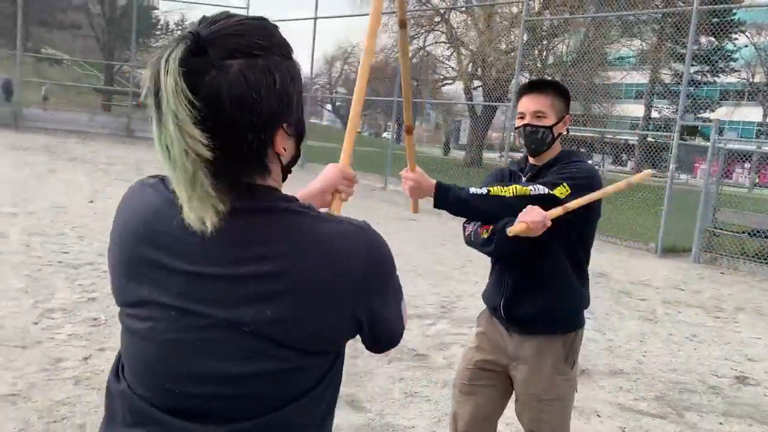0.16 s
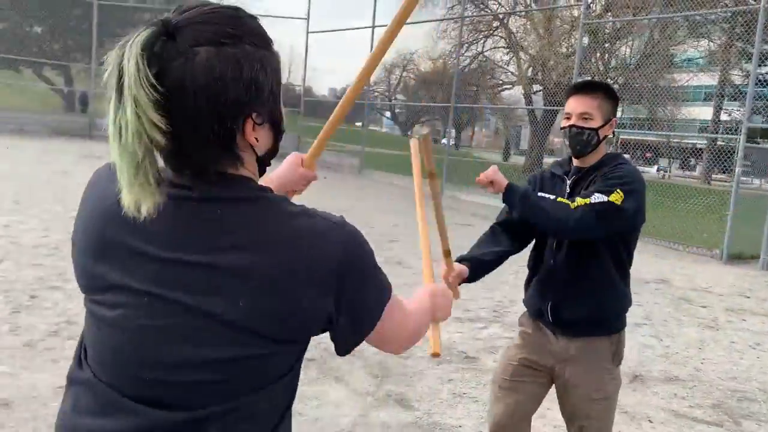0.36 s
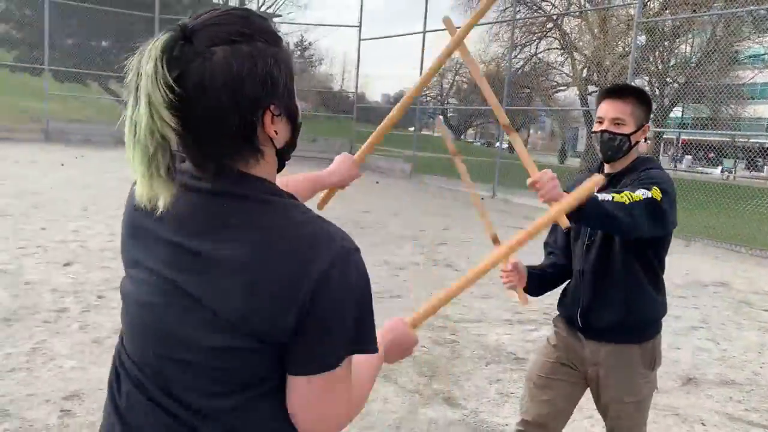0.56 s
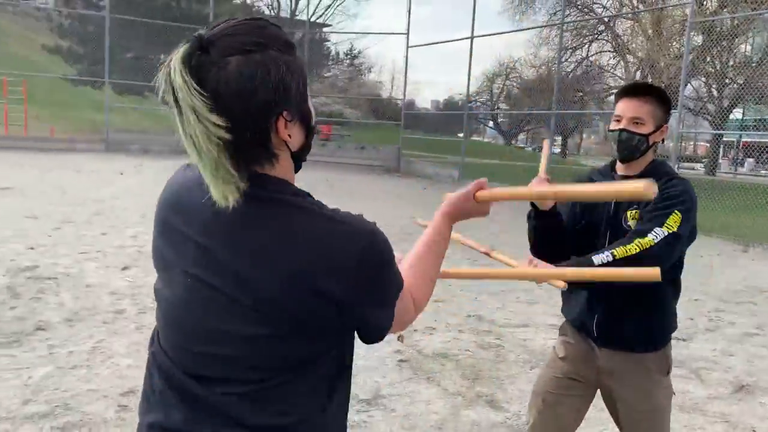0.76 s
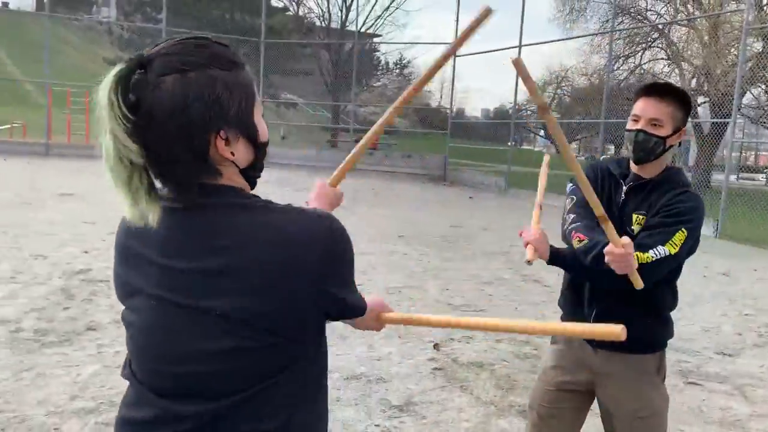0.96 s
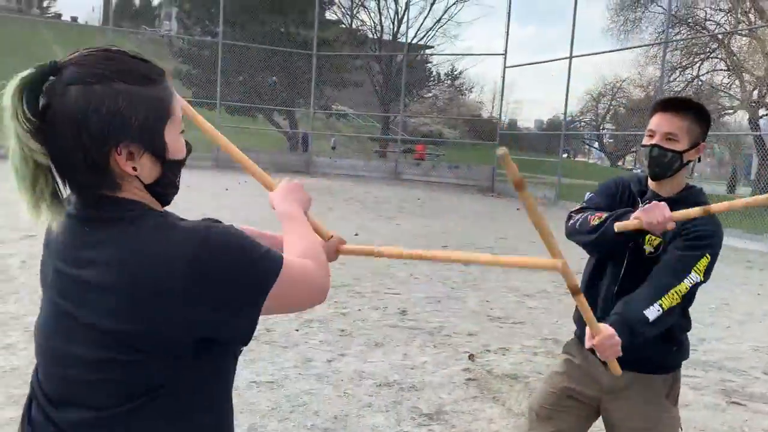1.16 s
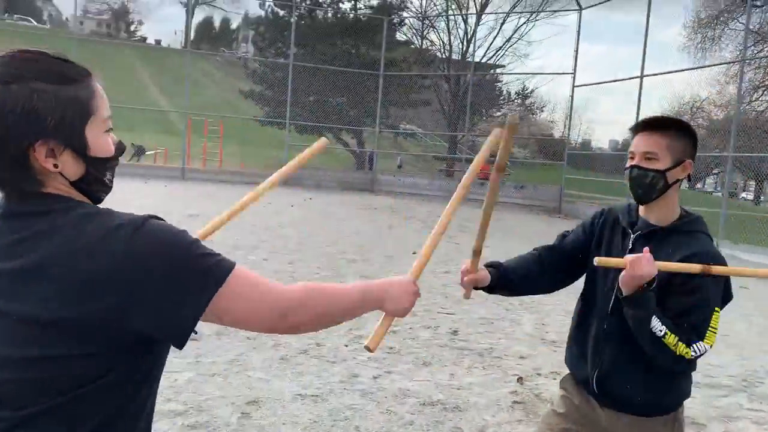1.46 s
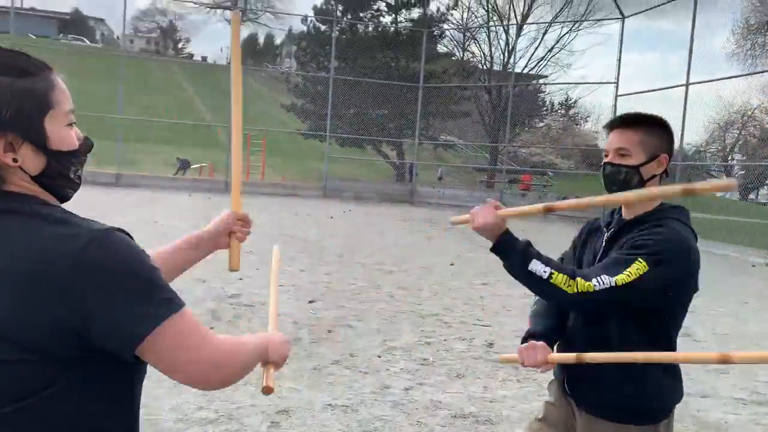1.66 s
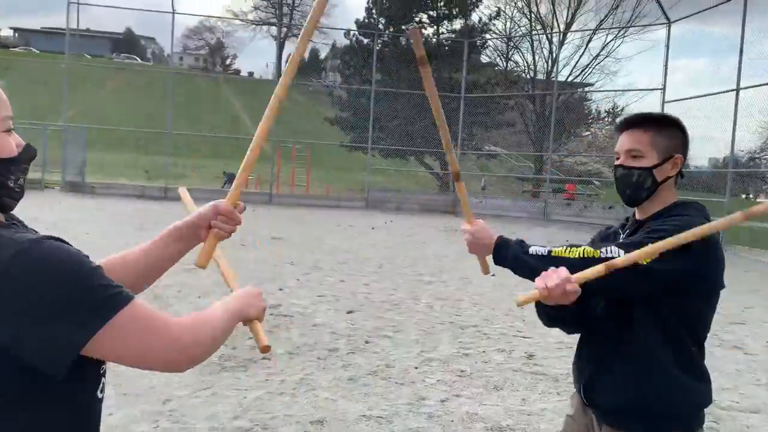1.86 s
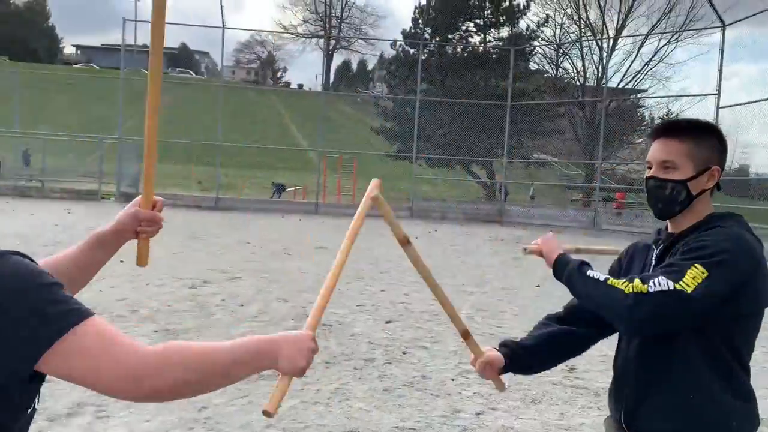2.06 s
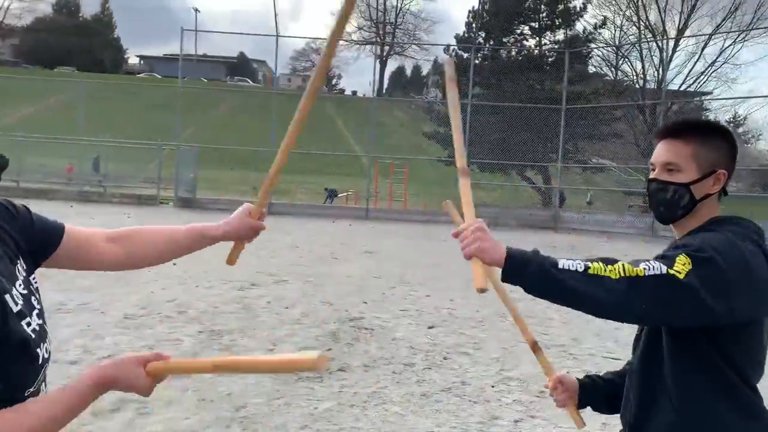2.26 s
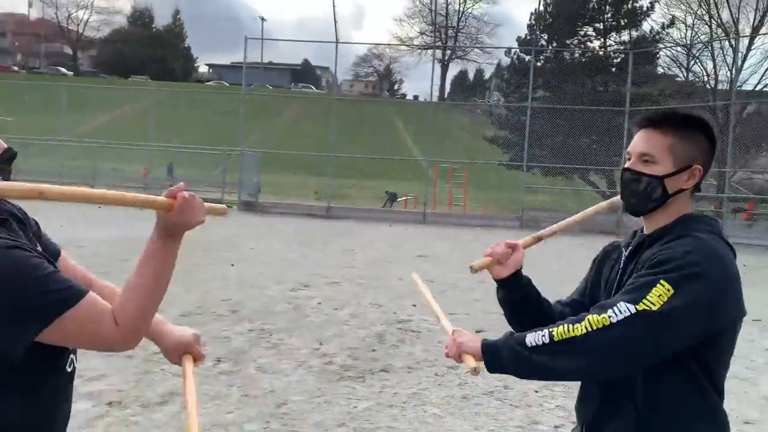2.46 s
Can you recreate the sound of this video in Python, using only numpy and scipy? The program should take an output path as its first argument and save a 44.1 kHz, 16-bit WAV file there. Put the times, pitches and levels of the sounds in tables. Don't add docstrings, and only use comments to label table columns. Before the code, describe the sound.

Wooden sticks clack hard together in a steady rhythm, close up, in an open gravel field.

```python
import sys
import numpy as np
from scipy import signal
from scipy.fft import rfft, irfft
from scipy.io import wavfile
from scipy.ndimage import uniform_filter1d

SR = 44100
rng = np.random.default_rng(int(sys.argv[2]) if len(sys.argv) > 2 else 0)


def ratio(d):
    e = np.asarray(d, float) / 20
    return 10 ** e


def wav_out(sig):
    wavfile.write(sys.argv[1], SR, np.round(np.clip(np.atleast_2d(sig).T, -1, 1) * 32767).astype(np.int16))


N = 114660

# start_s, wind_db, feet_db
AIR_COURSE = [(0, -18, -48), (.1, -12, -45), (.25, -16, -43.5), (.4, -10.5, -57), (.6, -16.5, -48),
              (.8, -6.5, -49.5), (.95, -19, -58.5), (1.03, -20, -65), (1.1, -28.5, -53), (1.16, -16, -48),
              (1.3, -13.5, -58.5), (1.45, -11, -56.5), (1.65, -23.5, -66), (1.82, -17, -44.5),
              (1.95, -21.5, -49), (2.08, -12.5, -52.5), (2.3, -19, -57.5), (2.5, -10, -47),
              (2.6, -39.5, -50.5)]
# frequency_hz, density_db (per Hz)
WIND_SPECTRUM = [(2, 1), (8, 2), (16, 6.5), (24, -26.5), (40, -21), (90, -43), (200, -47.5), (400, -87)]
# frequency_hz, density_db (per Hz)
FEET_SPECTRUM = [(1500, -40), (3000, -1), (6000, 1), (10000, -9.5), (13000, -14.5), (16000, -20)]
# frequency_hz, density_db (per Hz)
TOWN_SPECTRUM = [(35, -42), (60, -2), (180, -13), (540, -12), (698, -11.5), (2580, -22.5), (5330, -35.5),
                 (11300, -42), (16000, -93)]
# start_s, level_db, pitch_hz
POST_RETURNS = [(0.0303, -18, 3700), (0.3197, -11, 5600), (0.5897, -16.5, 3830), (0.8614, -30, 4240),
                (1.1473, -17, 3920), (1.4112, -18.5, 5200), (1.718, -22.5, 4040), (2.003, -13.5, 4600),
                (2.274, -14, 5950), (2.5721, -20.5, 4740)]
# start_s, level_db, low_mode_hz, middle_mode_hz, high_mode_hz
CLACKS = [
    (0.205, -3.5, 1003, 2830, 3320),
    (0.474, 1, 1110, 3530, 4750),
    (0.746, -5.5, 1050, 2347, 3610),
    (1.031, 7.5, 1193, 2849, 3897),
    (1.294, -2.5, 1470, 2105, 3716),
    (1.601, -0.5, 1622, 2640, 4256),
    (1.886, 1.5, 1400, 2080, 4200),
    (2.156, 2, 1549, 2306, 4100),
    (2.455, 0, 1534, 2780, 3620),
]
# low_mode_db, middle_mode_db, high_mode_db, grinding_db, lead_in_db
LANDINGS = [(-9, 3.5, 4.5, -13, -12), (-10, -8, -6.5, -15.5, -15), (-13.5, -0.5, -0.5, -13.5, -16),
            (-33, -1, -1.5, -19, -17.5), (-18, 1, 3.5, -14, -15), (-5.5, -2.5, -1.5, -11.5, -42),
            (-14.5, -0.5, -0.5, -10, -48), (-8, -0.5, -4, -10.5, -20), (-15.5, -3, 0.5, -13, -29)]
# pitch_hz, level_db, t60_s
STICK_MODES = [(676, -46.5, 0.06), (1097, -24, 0.066), (1661, -6, 0.036), (2128, -5.5, 0.036),
               (2800, -5.5, 0.031), (3405, -3, 0.014), (4000, -5, 0.024), (4770, -5.5, 0.019),
               (5150, 7, 0.0043), (6090, -12.5, 0.03), (7260, -16, 0.027), (8150, -74, 0.012),
               (9700, -81, 0.0023)]
# lag_s, level_db, pitch_hz, t60_s
MESH_RETURNS = [
    (.053, -26.5, 3300, 0.092),
    (0.065, -41.5, 2670, 0.027),
]
# start_s, level_db, pitch_hz
BOARD_RETURNS = [(0.2553, -11.5, 4330), (0.2656, -16.5, 3260), (0.7974, -22.5, 2940), (0.8085, -24, 3330),
                 (1.0821, -11, 3300), (1.0958, -27, 2540), (1.3468, -21.5, 4150), (1.3595, -22, 3500),
                 (1.6531, -23, 5290), (1.665, -24.5, 4300), (1.938, -15, 3930), (1.9506, -33, 2670),
                 (2.2089, -36, 4270), (2.5057, -19.5, 2670), (2.5203, -33, 2740)]
# start_s, level_db, pitch_hz, t60_s
TAPS = [(0.522, -16, 3000, 0.047), (0.5225, -21.5, 8800, .03), (0.541, -13.5, 2350, 0.063),
        (0.557, -24, 2560, 0.055), (.760, -12, 2900, .06), (1.041, 11, 3040, 0.0036),
        (1.619, -16, 6000, 0.056), (1.897, -5, 2180, 0.049), (1.899, -8, 7000, 0.043),
        (1.908, -5.5, 2800, 0.014), (2.2362, 5, 4000, 0.016), (2.2373, 0, 3270, 0.011),
        (2.24, -5, 2450, 0.018), (2.462, -32, 1480, 0.028)]
# start_s, offset (full scale = 1)
JOLTS = [
    (.746, .3),
    (1.0325, 1.8),
    (1.887, -.15),
    (2.157, .1),
    (2.456, -.12),
]
# pitch_hz, level_db, start_s, end_s
CIRCUIT_TONES = [(4000, -67, 1.4, 1.54), (8000, -72, 1.4, 1.54), (10000, -72, .34, .7),
                 (10000, -71, 1.38, 1.56), (10000, -73, 2.0, 2.5), (15000, -72, 1.08, 1.29),
                 (15000, -72, 1.48, 1.78), (15000, -73, 2.3, 2.45)]

TOWN_DB, GRIT_DB = -41, 1.5
POST_WIDTH_HZ, POST_T60_S = 3500, .009
BOARD_WIDTH_HZ, BOARD_T60_S = 4500, .016
DRIVE_DB = 2
STICK_DB, STICK_SCATTER_DB, STICK_DETUNE = -6.5, 1.5, .02
OWN_T60_S = .022, .014, .010
CRACK_DB, CRACK_HZ, CRACK_T60_S = -2.5, 4630, .0088
TAIL_DB, TAIL_HZ, TAIL_T60_S = -27.5, 4000, .099
GRIND_T60_S = .028
LEAD_S, LEAD_HZ = .0034, 6700
GROUND_S, GROUND_DB = .0058, -.5
TAP_WIDTH_HZ, TAP_TREBLE_DB = 3300, -20
FIELD_DB, FIELD_T60_S, FIELD_HZ = -45.5, 1, (1170, 7000)
JOLT_RISE_S, JOLT_FALL_S = .0022, .05
THUMP_SHARE, THUMP_S = .11, .02
SWAY_HZ, SWAY_PAST = 30, .7
CLIP, KNEE = .84, 8
SAG_HZ, MIC_HZ, TOP_HZ = .5, 10200, 16000


def unit(x):
    return x / np.sqrt(np.mean(x ** 2))


def fade(t, t60):
    return np.exp(-np.log(1000) * t / t60)


def band(x, lo_hz, hi_hz):
    edges = [lo_hz, min(hi_hz, .45 * SR)]
    return signal.sosfilt(signal.butter(2, edges, "band", fs=SR, output="sos"), x)


def add(out, x, s):
    i = int(s * SR)
    out[i:i + len(x)] += x[:N - i]


def walk(rate):
    k = int(SR / rate)
    steps = np.repeat(rng.standard_normal(N // k + 1), k)
    return unit(uniform_filter1d(uniform_filter1d(steps, k), k)[:N])


def coloured(spectrum):
    f = np.arange(N // 2 + 1) * SR / N + .1
    hz, db = np.array(spectrum).T
    gain = ratio(np.interp(np.log(f), np.log(hz), db))
    return unit(irfft(rfft(rng.standard_normal(N)) * gain, N))


def air_level(column):
    rows = np.array(AIR_COURSE)
    return np.interp(np.arange(N) / SR, rows[:, 0], rows[:, column])


def wind():
    return ratio(air_level(1)) * coloured(WIND_SPECTRUM)


def feet():
    grit = ratio(GRIT_DB * rng.exponential(size=N // 8 + 1).repeat(8)[:N])
    return ratio(air_level(2) + 2.1 * walk(26.9)) * coloured(FEET_SPECTRUM) * unit(grit)


def town():
    return ratio(TOWN_DB + .37 * walk(5.05)) * coloured(TOWN_SPECTRUM)


def tick(hz, width_hz, t60):
    t = np.arange(SR // 12) / SR
    edges = max(hz - width_hz / 2, 500), hz + width_hz / 2
    noise = unit(band(rng.standard_normal(len(t)), *edges))
    rise = np.minimum(t / (t60 / 20), 1)
    return band(noise * fade(t, t60) * rise, *edges) / 2


def post_returns():
    out = np.zeros(N)
    for s, db, hz in POST_RETURNS:
        add(out, ratio(db) * tick(hz, POST_WIDTH_HZ, POST_T60_S), s)
    return out


def clack(own_hz, own_db, grind_db, lead_db):
    t = np.arange(SR // 8) / SR
    hz, db, t60 = np.array(STICK_MODES).T
    chance = rng.standard_normal((3, len(hz)))
    hz = np.r_[hz * (1 + STICK_DETUNE * chance[0]), own_hz]
    db = np.r_[db + STICK_DB + STICK_SCATTER_DB * chance[1], own_db]
    t60 = np.r_[t60, OWN_T60_S]
    modes = ratio(db)[:, None] * fade(t, t60[:, None]) * np.sin(2 * np.pi * hz[:, None] * t)
    ring = modes.sum(axis=0)

    noise = rng.standard_normal((5, len(t)))
    crack = ratio(CRACK_DB) * fade(t, CRACK_T60_S) * unit(band(noise[0], CRACK_HZ / 2, CRACK_HZ * 2))
    tail = ratio(TAIL_DB) * fade(t, TAIL_T60_S) * unit(band(noise[1], TAIL_HZ / 3, TAIL_HZ * 3))

    force = ratio(grind_db) * fade(t, GRIND_T60_S) * noise[2] * np.abs(noise[3]) / 2
    force[0] += 1
    force[int(GROUND_S * SR)] += ratio(GROUND_DB)
    blow = signal.fftconvolve(force, ring + crack)[:len(t)] + tail

    lead = int(LEAD_S * SR)
    swell = ratio(lead_db) * np.linspace(.2, 1, lead)
    hiss = swell * unit(band(noise[4], LEAD_HZ / 2, LEAD_HZ * 2))[-lead:]
    return np.r_[hiss, blow]


def clacks():
    out = np.zeros(N)
    for (s, db, *own_hz), (*own_db, grind_db, lead_db) in zip(CLACKS, LANDINGS):
        add(out, ratio(db + DRIVE_DB) * clack(own_hz, own_db, grind_db, lead_db), s - LEAD_S)
    return out


def field_response():
    t = np.arange(SR // 2) / SR
    level = ratio(FIELD_DB) * fade(t, FIELD_T60_S) * np.minimum(t / .01, 1)
    return band(level * rng.standard_normal(len(t)) / 20, *FIELD_HZ)


def board_returns():
    out = np.zeros(N)
    for s, db, hz in BOARD_RETURNS:
        add(out, ratio(db) * tick(hz, BOARD_WIDTH_HZ, BOARD_T60_S), s)
    return out


def mesh_returns():
    out = np.zeros(N)
    for s, db, *_ in CLACKS:
        for lag, mesh_db, hz, t60 in MESH_RETURNS:
            add(out, ratio(db + DRIVE_DB + mesh_db) * tick(hz, 1.47 * hz, t60), s + lag)
    return out


def taps():
    out = np.zeros(N)
    for s, db, hz, t60 in TAPS:
        treble = ratio(TAP_TREBLE_DB) * tick(7400, 11000, t60)
        add(out, ratio(db) * (tick(hz, TAP_WIDTH_HZ, t60) + treble), s)
    return out


def jolts():
    out, t = np.zeros(N), np.arange(SR // 3) / SR
    push = (1 - np.exp(-t / JOLT_RISE_S)) * np.exp(-(t / JOLT_FALL_S) ** 2)
    for s, offset in JOLTS:
        add(out, offset * push, s)
    return out


def thumps():
    out = np.zeros(N)
    for s, offset in JOLTS:
        add(out, THUMP_SHARE * offset * np.ones(int(THUMP_S * SR)), s)
    return uniform_filter1d(out, size=90)


def whine():
    out, t = np.zeros(N), np.arange(N) / SR
    for hz, db, start, end in CIRCUIT_TONES:
        gate = uniform_filter1d(1. * (t > start) * (t < end), size=800)
        out += ratio(db + 2 * walk(8.4)) * gate * np.sin(2 * np.pi * hz * t)
    return out


def scene():
    background = wind() + feet() + town()
    direct = clacks() + taps()
    reverberation = signal.fftconvolve(direct, field_response())[:N]
    reflections = post_returns() + board_returns() + mesh_returns()
    return (background + direct + reverberation + reflections)[None]


def top_cut(x):
    return signal.sosfilt(signal.butter(12, 16430, fs=SR, output="sos"), x)


def record(dry):
    sway = SWAY_PAST * signal.sosfiltfilt(signal.butter(2, SWAY_HZ, fs=SR, output="sos"), dry)
    x = (dry - sway + whine() + jolts()) / CLIP
    x = CLIP * x / (1 + np.abs(x) ** KNEE) ** (1 / KNEE)
    x = x + sway + thumps()
    x = signal.sosfilt(signal.butter(1, [SAG_HZ, MIC_HZ], "band", fs=SR, output="sos"), x)
    x = signal.sosfilt(signal.butter(4, TOP_HZ, fs=SR, output="sos"), x)
    x = np.clip(x, -.93, .93)
    x = signal.sosfilt(signal.ellip(10, .2, 90, TOP_HZ, fs=SR, output="sos"), x)
    return top_cut(x)


dry = scene()
out = record(dry)
wav_out(out)
```